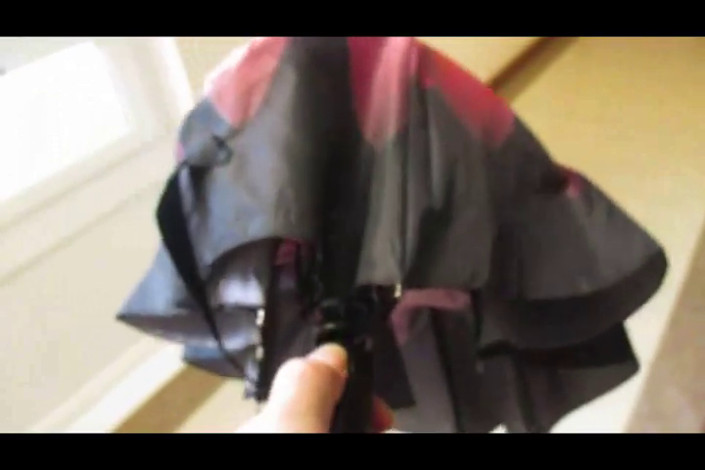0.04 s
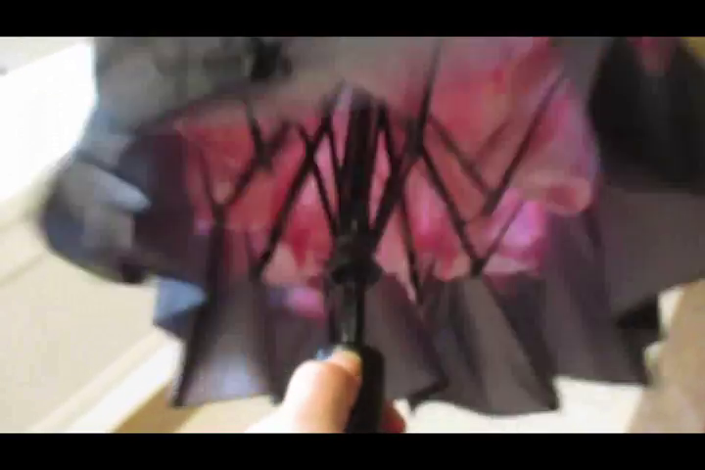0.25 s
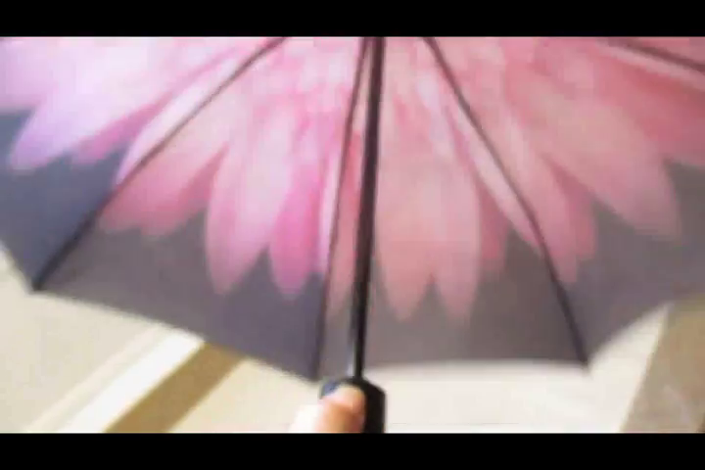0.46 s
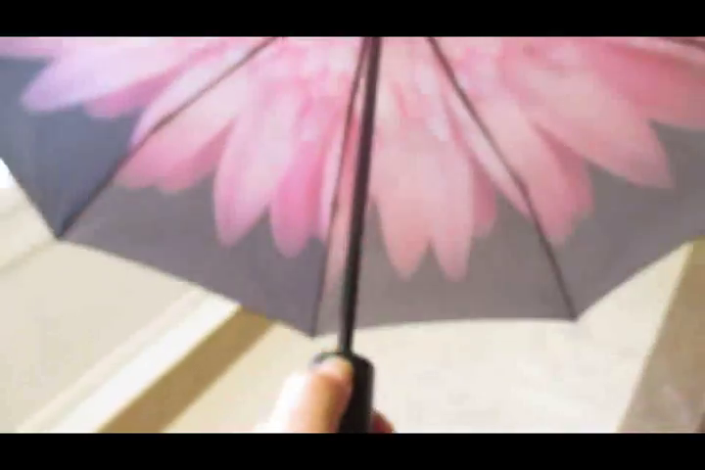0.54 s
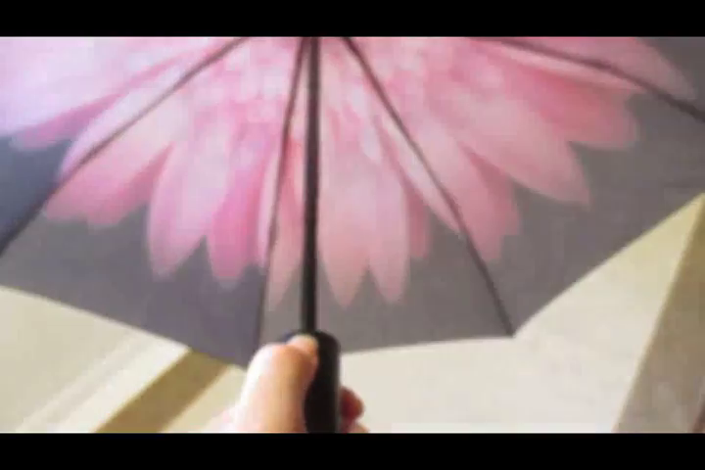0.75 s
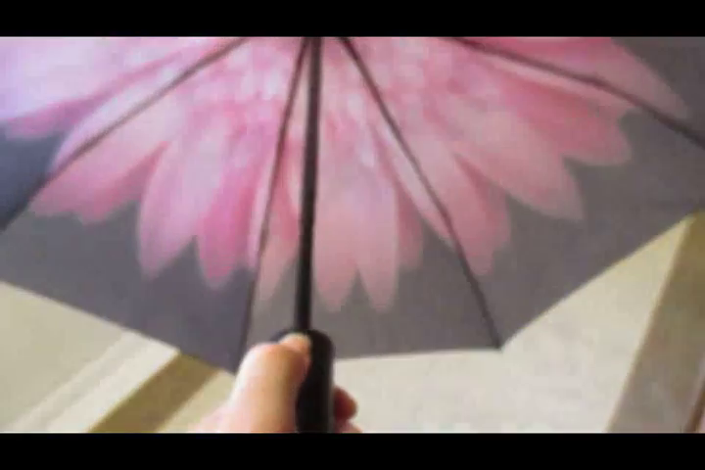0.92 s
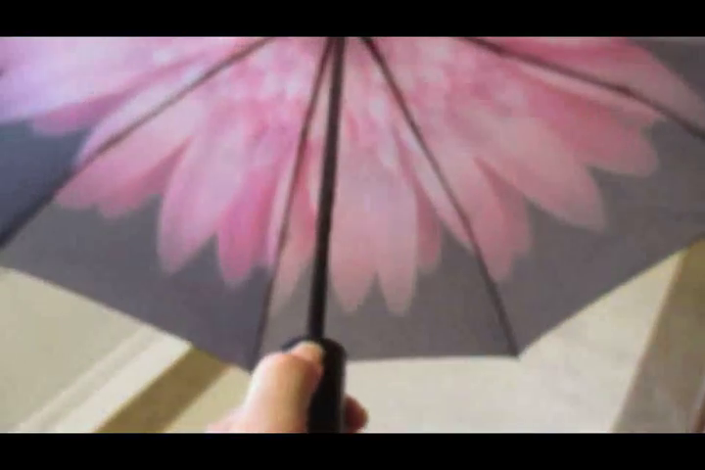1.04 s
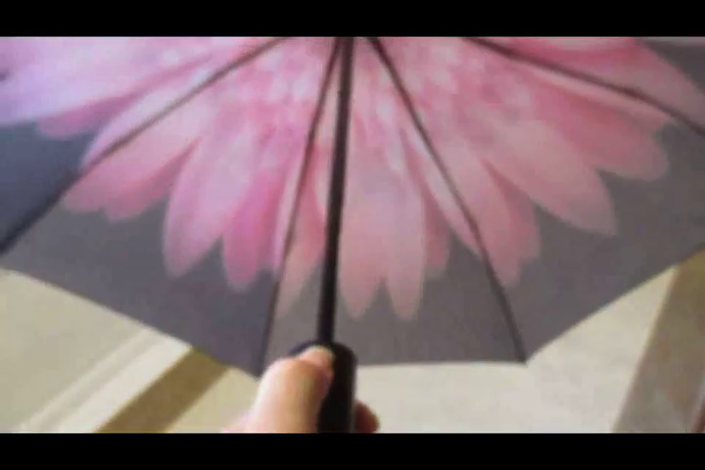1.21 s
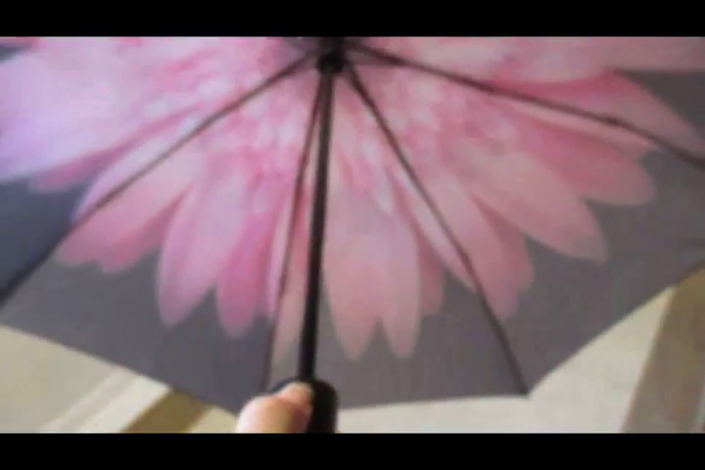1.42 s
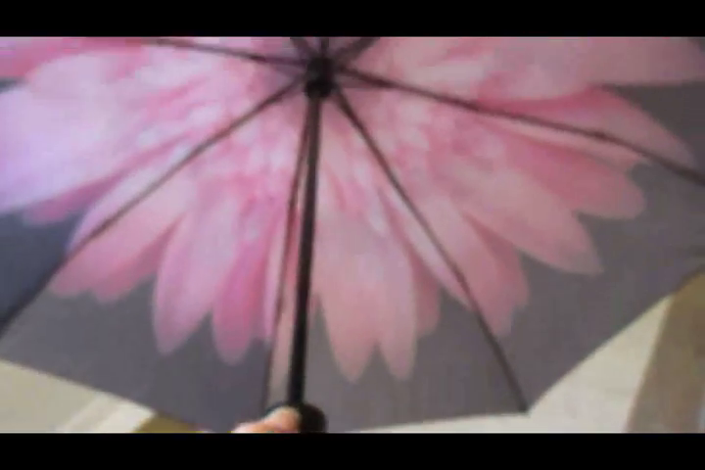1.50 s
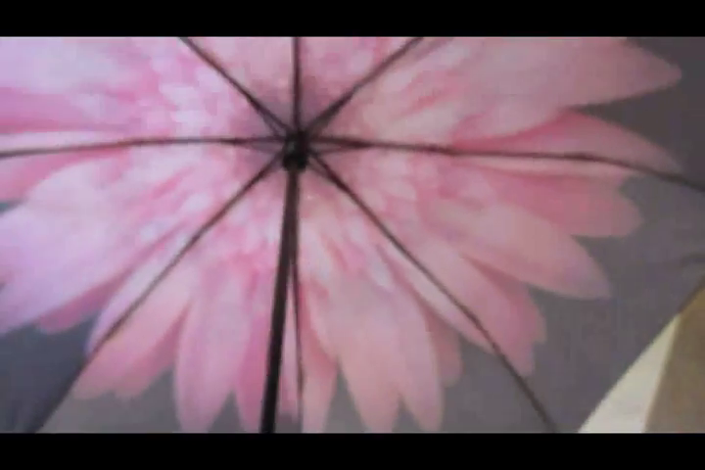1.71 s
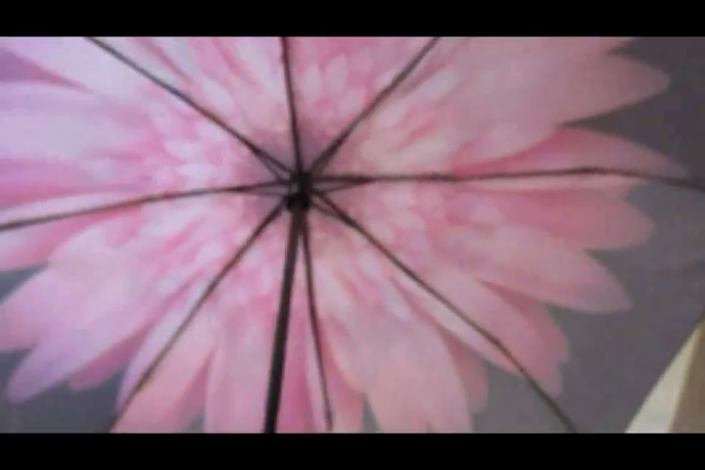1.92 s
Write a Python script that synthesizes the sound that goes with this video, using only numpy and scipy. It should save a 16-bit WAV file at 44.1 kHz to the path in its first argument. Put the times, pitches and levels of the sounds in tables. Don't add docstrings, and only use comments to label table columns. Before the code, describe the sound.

A spring-loaded umbrella pops open indoors with a click, whoosh and hard snaps, then small plastic clicks

```python
import sys
import numpy as np
from scipy import signal
from scipy.fft import rfft, irfft
from scipy.io import wavfile
from scipy.ndimage import uniform_filter1d

SR = 44100
rng = np.random.default_rng(int(sys.argv[2]) if len(sys.argv) > 2 else 0)


def decibels_to_gain(level_db):
    exponent = np.asarray(level_db, float) / 20
    return 10 ** exponent


def transcribe(signal):
    frames = np.atleast_2d(signal).T
    limited = np.clip(frames, -1, 1)
    pcm = np.round(limited * 32767).astype(np.int16)
    wavfile.write(sys.argv[1], SR, pcm)


N = 85995
TAUT_S = 0.545


def evened(x):
    return x / np.sqrt(np.mean(x ** 2) + 1e-20)


def read(points, hz):
    f, value = np.transpose(points)
    return np.interp(np.log(hz + 1), np.log(f + 1), value)


def add(mix, s, sound):
    part = mix[round(s * SR):][:len(sound)]
    part += sound[:len(part)]


def colour(x, points):
    gain = decibels_to_gain(read(points, np.fft.rfftfreq(N, 1 / SR)))
    return evened(irfft(rfft(x) * gain, N))


def course(points):
    s, db = np.transpose(points)
    return decibels_to_gain(np.interp(np.arange(N) / SR, s, db, left=-120, right=-120))


def wander(per_s):
    width = max(int(SR / per_s), 2)
    once = uniform_filter1d(rng.standard_normal(N), width)
    return evened(uniform_filter1d(once, width))


# (time [s], peak [dB], length [s], ring [Hz], crack re ring [dB])
TICKS = [
    (0.123, -46, 0.0018, 4500, -0.5),
    (0.1484, -51, 0.004, 2470, 4),
    (.1693, -31, 0.0012, 2440, -2.5),
    (0.17, -45, 0.0076, 2460, -2.5),
    (0.227, -45, .005, 5050, 8.5),
]
LOUD_SNAPS = [(0.2362, -13.5, 0.0023, 3360, 7), (.2361, -16, 0.0019, 5390, -6),
              (0.2366, -13, 0.0041, 606, -18), (0.2359, -16.5, 0.0028, 1640, -14.5),
              (0.2366, -16.5, 0.0029, 1040, -9.5), (0.239, -34, 0.0079, 2760, 7.5),
              (0.35, -21.5, 0.0011, 1500, -10), (0.3762, -14, 0.0019, 834, -14.5),
              (0.3794, -12, 0.0014, 3030, 5), (0.379, -32.5, 0.0032, 6620, -2.5),
              (0.3807, -17.5, 0.0023, 4450, -4.5), (0.4218, -15, 0.0019, 2720, -6.5),
              (0.417, -20.5, 0.0058, 996, -3), (0.4269, -2, 0.0009, 950, -15.5),
              (.429, -5, 0.00042, 4700, -13), (0.465, -27.5, 0.0027, 2950, -3),
              (.473, -29, 0.0019, 3820, 3.5), (.533, -5, .0021, 4262, -13.5),
              (0.5336, -20.5, 0.0021, 6884, -8.5), (0.5328, -17.5, 0.0018, 5630, -13),
              (.534, -12, 0.0023, 1375, -1), (0.534, -11, 0.0052, 610, -19),
              (0.533, -41, 0.013, 2874, 14.5), (0.849, -61, 0.0027, 6000, -1.5)]
MORE_SNAPS = [(.2366, -15.5, 0.0021, 280, -20.5), (.2361, -14.5, 0.0029, 3530, -10),
              (.2362, -14, 0.0037, 2830, -14), (.4289, -8.5, 0.00081, 2400, -15),
              (.4195, -18.5, .002, 2900, -7), (.4268, -18, .0008, 2400, 8), (.4255, -14.5, .002, 300, -17),
              (.4305, -15.5, .004, 1050, -8.5), (.5336, -15, .002, 2130, -16), (.5337, -12.5, .001, 4900, 0),
              (.538, -31, .003, 5200, 0.5), (.562, -28.5, .012, 790, -5), (0.55, -30.5, .015, 830, -4),
              (.62, -28.5, .012, 640, -15), (0.19, -40, .004, 700, -6), (.168, -43.5, .006, 330, -14.5)]
SHELL_RATTLE = [(1.5607, -38.5, 0.0039, 950, -13), (1.561, -56.5, .016, 4280, 7.5),
                (1.5705, -46, .003, 4150, -12), (1.5715, -52, .003, 2910, -6),
                (1.5776, -48.5, 0.0035, 1000, -8.5), (1.576, -57, 0.0019, 4400, -6),
                (1.6702, -30, 0.0041, 940, -21.5), (1.668, -34, 0.0042, 700, -22),
                (1.672, -39.5, 0.0054, 6050, -12), (1.673, -32, 0.0035, 3745, -17),
                (1.674, -40, .003, 6120, -4), (1.6797, -48, .008, 4070, -17.5),
                (1.68, -50, 0.01, 3850, -25), (1.794, -26.5, 0.0032, 1960, -9),
                (1.7959, -26, 0.0043, 965, -19), (1.799, -35, .012, 3822, -20.5),
                (1.799, -35.5, 0.012, 4177, -20.5), (1.8012, -34, .004, 5900, -11),
                (1.8008, -35, .004, 2800, -11), (1.796, -30, .003, 6170, -10),
                (1.802, -40, .004, 2290, -12.5)]


def snaps(rows):
    out = np.zeros(N)
    chance = rng.standard_normal((len(rows), 2000))
    for (s, db, length_s, hz, crack_db), noise in zip(rows, chance):
        t = np.arange(2000) / SR
        u = t / length_s
        hump = 3 * u * np.exp(1 - 3 * u - 0.52 * u ** 2)
        ring = -np.sin(2 * np.pi * hz * t)
        add(out, s, decibels_to_gain(db) * hump * (ring + decibels_to_gain(crack_db) * noise))
    return out


# (time [s], peak [dB], pitch [Hz], t60 [s])
BLOWS = [(0.129, -39, 89, 0.043), (0.172, -41.5, 221, 0.081), (.455, -19.5, 75, 0.13),
         (0.2361, -21.5, 68.6, 0.05), (0.256, -32.5, 49.8, 0.13), (0.3335, -13.5, 92, .045),
         (0.425, -21, 260, 0.054), (0.4366, -12, 264.3, 0.04), (0.463, -16, 283, 0.086),
         (0.521, -16.5, 209, 0.11), (0.525, -25, 40, 0.17), (0.533, -2.5, 280.4, 0.034),
         (.574, -19.5, 376.3, 0.085), (.54, -17.5, 30, 0.24), (.599, -13, 230, 0.03),
         (0.616, -23, 397, 0.065), (.624, -29.5, 334, 0.11), (0.68, -29, 252.6, .2),
         (.741, -38.5, 307, 0.1), (.242, -28, 166, .04), (1.236, -33.5, 39.9, 0.12),
         (1.771, -35, 31.7, 0.26), (0.263, -34, 223, .15), (0.402, -24, 250, 0.094)]


def thumps():
    out, t = np.zeros(N), np.arange(SR // 2) / SR
    for s, db, hz, t60_s in BLOWS:
        onset = 1 - np.exp(-t * hz * 8)
        add(out, s, -decibels_to_gain(db - 60 * t / t60_s) * np.sin(2 * np.pi * hz * t) * onset)
    return out


# (time [s], level [dB])
RUNNER_COURSE = [(.236, -50.5), (.243, -28.5), (.28, -36), (.33, -27.5), (.41, -29.5), (.445, -38.5),
                 (.5, -35), (.55, -44), (.76, -74.5)]
# (frequency [Hz], density [dB per Hz])
SCRAPE_SPECTRUM = [(180, -40), (300, -7.5), (660, -4), (1240, -12.5), (1550, -11.5), (3690, -11.5),
                   (6300, -15), (7300, -12.5), (9490, -48.5), (16100, -120)]
GRAINS_PER_S, GRAIN_SPREAD_DB, GRAIN_POWER_SHARE = 4000, 2.5, 0.45
JUDDER_DB, JUDDERS_PER_S = 1.5, 65


def runner():
    size = decibels_to_gain(GRAIN_SPREAD_DB * np.minimum(rng.exponential(1, N), 5))
    grains = size * (rng.random(N) < GRAINS_PER_S / SR) * rng.standard_normal(N)
    loose = np.arange(N) / SR < TAUT_S
    share = GRAIN_POWER_SHARE * loose
    mix = np.sqrt(share) * evened(grains) + np.sqrt(1 - share) * rng.standard_normal(N)
    judder = decibels_to_gain(JUDDER_DB * loose * wander(JUDDERS_PER_S))
    return course(RUNNER_COURSE) * judder * colour(mix, SCRAPE_SPECTRUM)


# (time [s], level [dB])
BILLOW_COURSE = [(.325, -48.5), (.336, -26), (.39, -38), (.43, -12.5), (.449, -27), (.467, -21.5),
                 (.495, -30.5), (.57, -34.5), (.86, -73)]
# (frequency [Hz], density [dB per Hz])
CLOTH_SPECTRUM = [(65, -41), (110, -9), (293, -2), (431, -7), (852, -2), (1150, -12), (2700, -14),
                  (3900, -21.5), (7200, -34), (9360, -54), (15800, -120)]
FLAP_DB, FLAPS_PER_S = 3, 90


def canopy():
    depth_db = FLAP_DB * np.where(np.arange(N) / SR < TAUT_S, 1, 0.3)
    flaps = decibels_to_gain(depth_db * wander(FLAPS_PER_S))
    air = colour(rng.standard_normal(N), CLOTH_SPECTRUM)
    return course(BILLOW_COURSE) * evened(flaps * air)


# (frequency [Hz], level [dB], t60 [s])
HUM_MODES = [(30, -29.5, 1.6), (57.6, -38, 1.8), (90.7, -29.5, 2.16), (112.4, -41, 2.6),
             (153.2, -33.5, 2.22), (204.5, -36, 1.4), (231.8, -34, 1.56), (287.6, -39.5, 0.46),
             (367.7, -42, 0.63), (555, -56, 3.1)]
# (time [s], level [dB])
HUM_KICKS = [
    (.42, -0.5),
    (0.535, -5),
]
WAVER_DB, WAVERS_PER_S, HUM_RISE_S = -2.5, 3.3, 0.028


def hum():
    out, t = np.zeros(N), np.arange(N) / SR
    for hz, db, t60_s in HUM_MODES:
        size = np.zeros(N)
        for s, kick_db in HUM_KICKS:
            add(size, s, decibels_to_gain(db + kick_db - 60 * t / t60_s) * (1 - np.exp(-t / HUM_RISE_S)))
        tone = np.sin(2 * np.pi * (hz * t + rng.random()))
        out += size * decibels_to_gain(WAVER_DB * wander(WAVERS_PER_S)) * tone
    return out


# (time [s], level [dB], length [s], centre [Hz])
CREEPS = [
    (0.971, -67.5, 0.029, 4930),
    (1.006, -66, 0.056, 5520),
    (1.094, -78, 0.017, 6430),
    (1.247, -73, 0.039, 6320),
]
CREEP_WIDTHS = [0.61, .5, 0.045, .05]


def settle():
    out = np.zeros(N)
    for (s, db, length_s, hz), width in zip(CREEPS, CREEP_WIDTHS):
        edges_hz = [hz * (1 - width / 2), hz * (1 + width / 2)]
        band = signal.butter(2, edges_hz, "band", fs=SR, output="sos")
        puff = evened(signal.sosfilt(band, rng.standard_normal(6000)))[:int(length_s * SR)]
        add(out, s, decibels_to_gain(db) * np.hanning(len(puff)) * puff)
    return out


# (time [s], peak [dB], chatter [s], bright tilt [dB per octave], button ping [dB])
FINGER_CLICKS = [
    (1.3782, -25, 0.0051, 3, 7),
    (1.562, -38, 0.0062, 3, -12),
    (1.6682, -22, 0.0053, -1.3, -2),
    (1.7944, -16.5, 0.011, 0.5, 1),
]
# (frequency [Hz], level [dB], t60 [s])
SHELL_MODES = [(747, -4.5, 0.022), (1036, 0.5, 0.0098), (1300, -6, 0.013), (1680, -0.5, 0.0063),
               (1957, -5, .012), (2194, -10, 0.0076), (2474, -12.5, 0.024), (2865, 0.5, 0.012),
               (3824, -4.5, 0.037), (4184, -11, 0.041), (4570, -8, 0.0091), (5900, -3, 0.013),
               (6390, -12.5, 0.0114), (6940, -13.5, 0.0072)]
LOW_MODE_GRIP = [9.4, 7.9, 1.6, 4.5]
LONG_MODE_GRIP = [-11, -6, -6, 3.5]
PING_HZ, PING_DB, PING_S = 3020, 9.5, 0.0022
LATE_HITS_S, LATE_HITS_DB = 0.0043, -24.5
CHATTER_END_S, CRACK_DB, SHELL_LOW_HZ = 0.0098, -11, 420
SPRING_HZ, SPRING_DB, SPRING_T60_S = 1003, -40.5, 2.3


def shell_ring(u, tilt_db, low_db, long_db):
    body = np.zeros(len(u))
    for k, (hz, db, t60_s) in enumerate(SHELL_MODES):
        grip_db = low_db * (k == 0) + long_db * (k in (8, 9))
        level_db = db + grip_db + tilt_db * np.log2(hz / 1000)
        body += (-1) ** k * decibels_to_gain(level_db - 60 * u / t60_s) * np.sin(2 * np.pi * hz * u)
    return body


def clicks():
    out, t = np.zeros(N), np.arange(SR // 2) / SR
    u = t[:1200]
    chance = rng.standard_normal((len(FINGER_CLICKS), 2, 1200))
    rows = zip(FINGER_CLICKS, LOW_MODE_GRIP, LONG_MODE_GRIP, chance)
    for (s, db, chatter_s, tilt_db, ping_db), low_db, long_db, (size, pick) in rows:
        force = np.exp(-u / chatter_s * 2) + decibels_to_gain(LATE_HITS_DB) * (u > LATE_HITS_S)
        end_s = CHATTER_END_S * (1 + (ping_db < -9))
        hits = size * (pick > 0.9) * force * (u < end_s)
        hits[0] = -1
        ring = np.convolve(hits, shell_ring(u, tilt_db, low_db, long_db))
        top = np.abs(ring).max()
        ring[:1200] += top * decibels_to_gain(CRACK_DB) * hits
        hump = u / PING_S * np.exp(-(u / PING_S) ** 2 * 3)
        ring[:1200] += top * decibels_to_gain(PING_DB + ping_db) * hump * np.sin(2 * np.pi * PING_HZ * u)
        add(out, s, decibels_to_gain(db) * ring / np.abs(ring).max())
        spring = np.sin(2 * np.pi * SPRING_HZ * (s + t))
        add(out, s, decibels_to_gain(db + SPRING_DB - 60 * t / SPRING_T60_S) * spring)
    return signal.sosfilt(signal.butter(4, SHELL_LOW_HZ, "high", fs=SR, output="sos"), out)


# (frequency [Hz], t60 [s])
HALL_DECAY = [(125, 0.66), (400, 0.81), (1000, 0.74), (2500, 0.57), (5000, 0.5), (7500, 0.58)]


def hall(x):
    taps = np.zeros(SR)
    at = np.arange(200, SR - 20, 20)
    taps[at + rng.integers(0, 20, len(at))] = rng.choice([-1., 1.], len(at))
    hz, t, z = signal.stft(taps, SR, nperseg=256)
    t60_s = np.maximum(read(HALL_DECAY, hz), 0.05)[:, None]
    tail = signal.istft(z * decibels_to_gain(-60 * t / t60_s), SR, nperseg=256)[1]
    return signal.fftconvolve(x, tail / np.linalg.norm(tail))[:N]


# (frequency [Hz], density [dB per Hz])
ROOM_SPECTRUM = [(12, -44.5), (20, -1.5), (121, -1.5), (176, -7), (261, -13), (533, -16), (603, -18),
                 (874, -19), (1300, -26), (7300, -38.5), (9490, -66.5), (16100, -120)]
# (frequency [Hz], density [dB per Hz])
HISS_SPECTRUM = [(300, -18), (1000, -3), (2500, 4.5), (5000, -7), (7400, 5.5)]
ROOM_DB, HISS_DB = -44.5, -67
DUCK_S, DUCK_DB, RECOVER_DB_PER_S = 0.45, -12, 4.5


def quiet():
    t = np.arange(N) / SR
    recovery_db = np.minimum(DUCK_DB + RECOVER_DB_PER_S * (t - DUCK_S), 0)
    duck_db = np.where(t > DUCK_S, recovery_db, 0)
    room_gain = decibels_to_gain(ROOM_DB + duck_db + 1.3 * wander(per_s=9.2))
    room = room_gain * colour(rng.standard_normal(N), ROOM_SPECTRUM)
    return room + decibels_to_gain(HISS_DB) * colour(rng.standard_normal(N), HISS_SPECTRUM)


SNAP_HALL_DB, BROAD_HALL_DB, SHELL_HALL_DB = -26, -10.5, -31.5


def scene():
    sharp = snaps(TICKS + LOUD_SNAPS)
    broad = thumps() + runner() + canopy()
    fingers = clicks()
    send = decibels_to_gain(SNAP_HALL_DB) * sharp + decibels_to_gain(BROAD_HALL_DB) * broad + decibels_to_gain(SHELL_HALL_DB) * fingers
    umbrella = sharp + broad + hall(send) + hum() + settle()
    close = fingers + snaps(MORE_SNAPS + SHELL_RATTLE)
    return (umbrella + close + quiet())[None]


def band_limit(x):
    return signal.sosfilt(signal.butter(12, 8590, fs=SR, output="sos"), x)


CEILING, EDGE_HZ = 0.88, 7234


def record(dry):
    band = signal.firwin(501, EDGE_HZ, window=("kaiser", 7.5), fs=SR)
    clipped = np.clip(dry, -CEILING, CEILING)
    limited = signal.oaconvolve(clipped, band[None], "same")
    return band_limit(limited)


dry = scene()
out = record(dry)
transcribe(out)
```